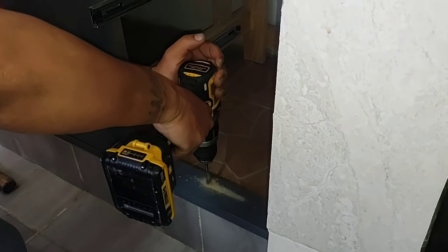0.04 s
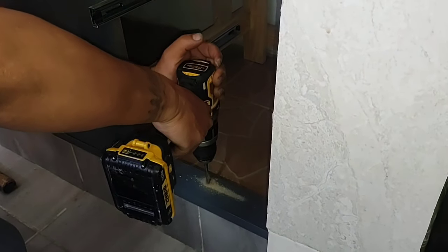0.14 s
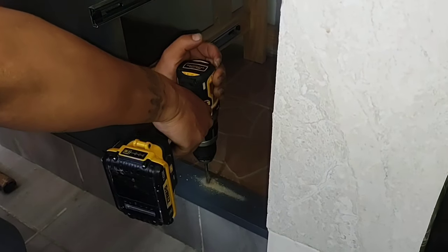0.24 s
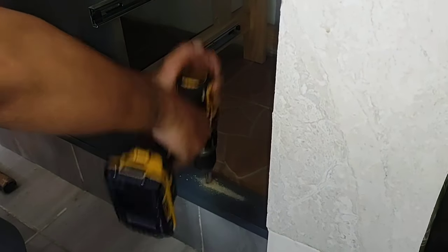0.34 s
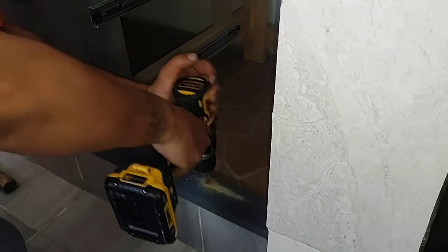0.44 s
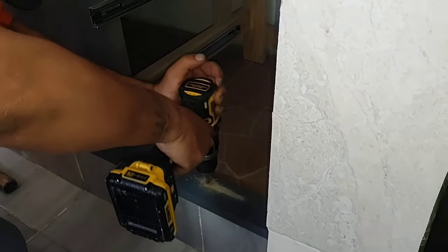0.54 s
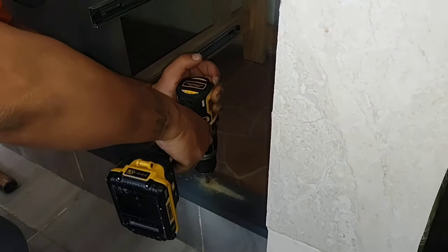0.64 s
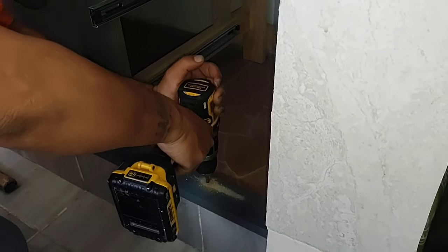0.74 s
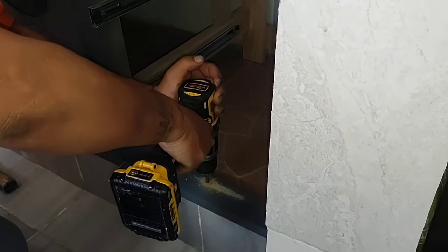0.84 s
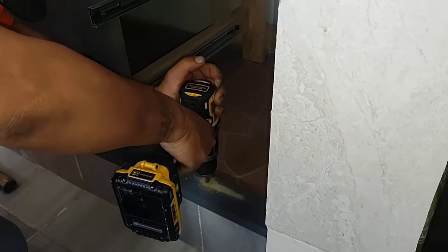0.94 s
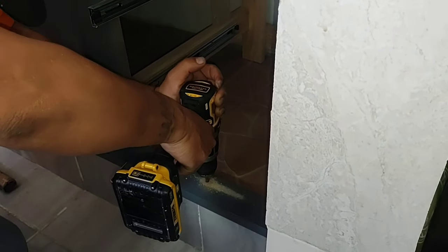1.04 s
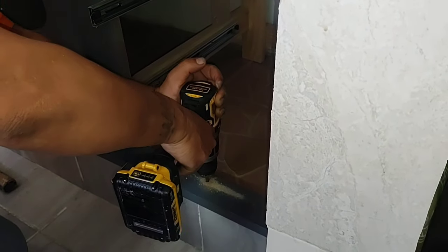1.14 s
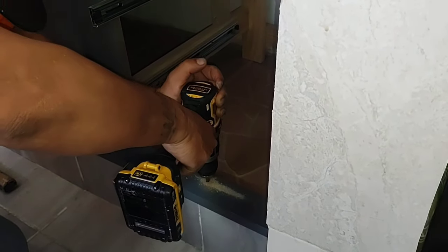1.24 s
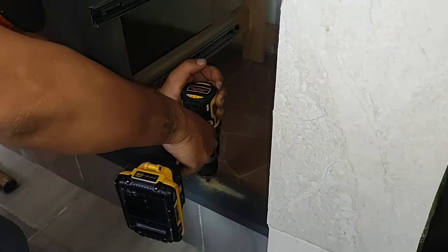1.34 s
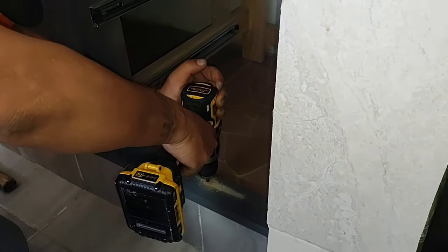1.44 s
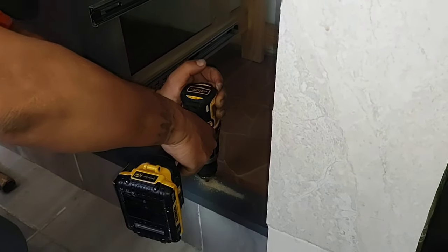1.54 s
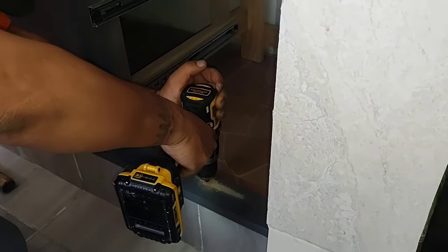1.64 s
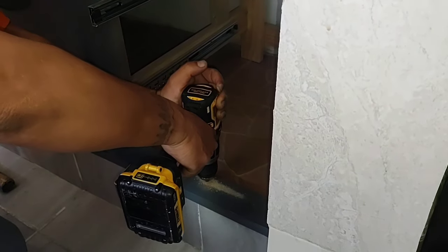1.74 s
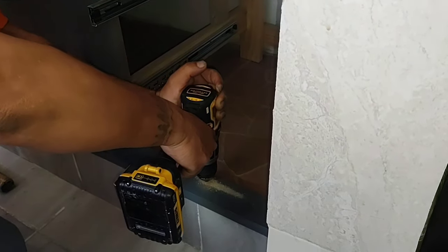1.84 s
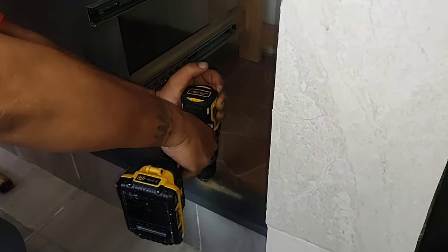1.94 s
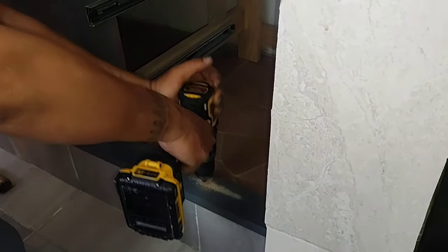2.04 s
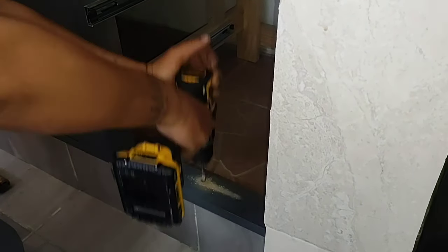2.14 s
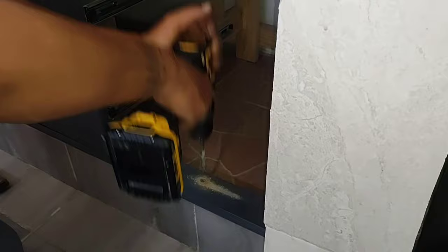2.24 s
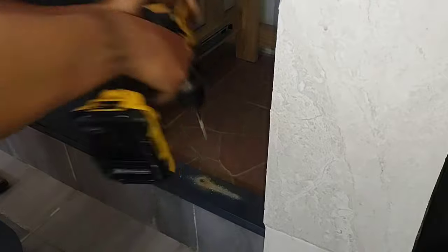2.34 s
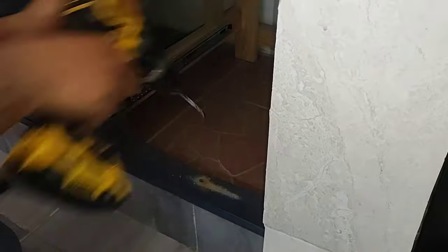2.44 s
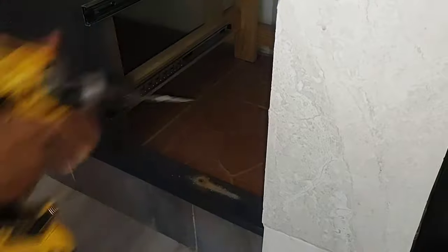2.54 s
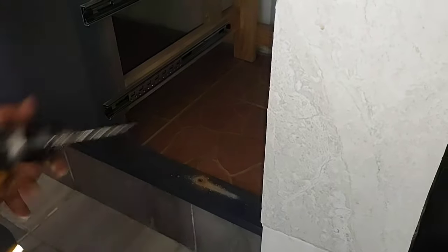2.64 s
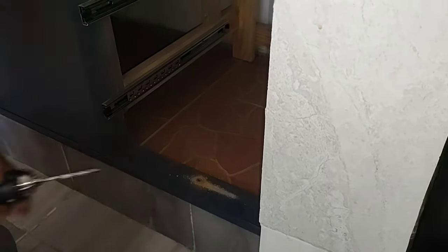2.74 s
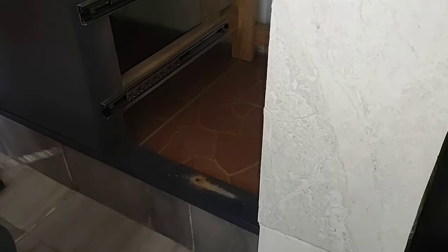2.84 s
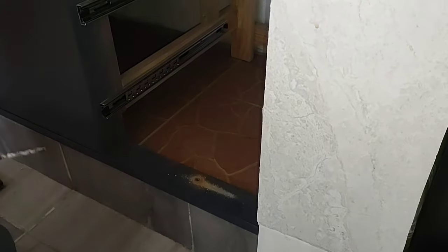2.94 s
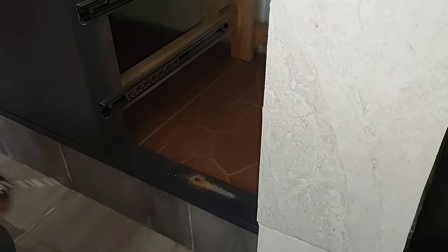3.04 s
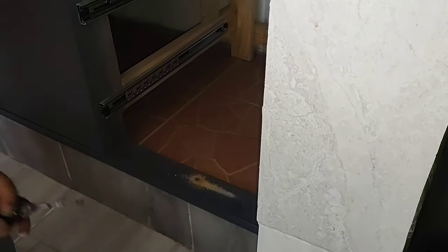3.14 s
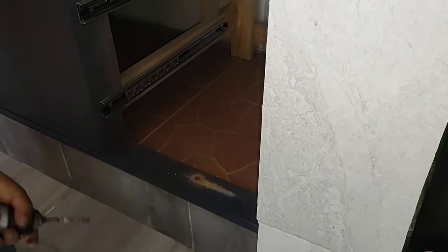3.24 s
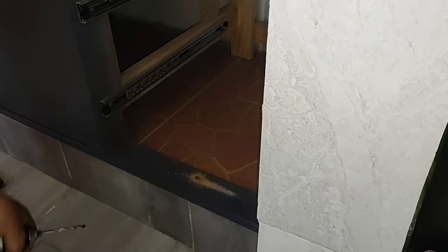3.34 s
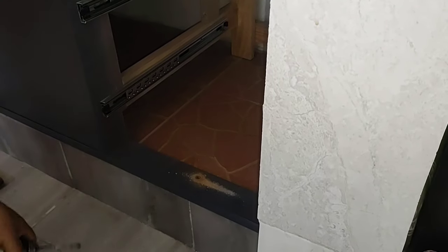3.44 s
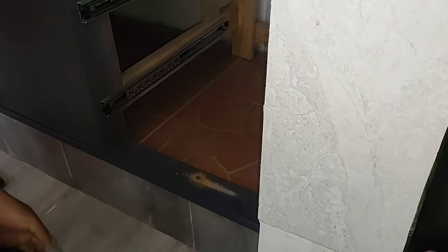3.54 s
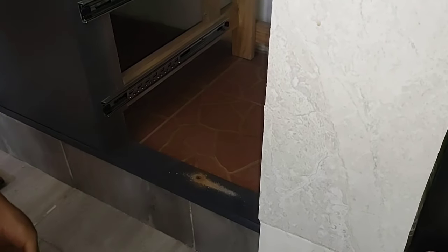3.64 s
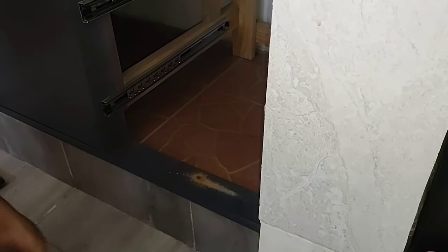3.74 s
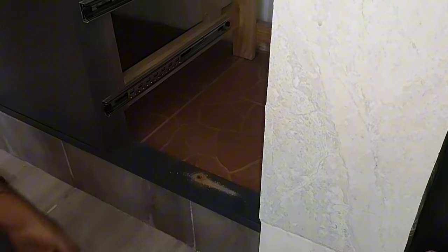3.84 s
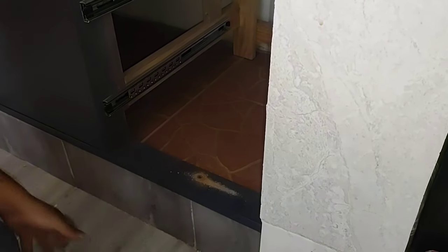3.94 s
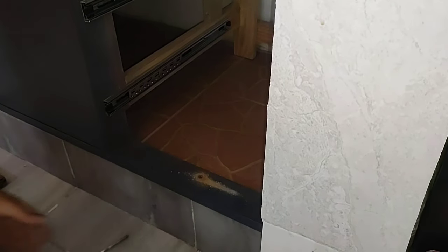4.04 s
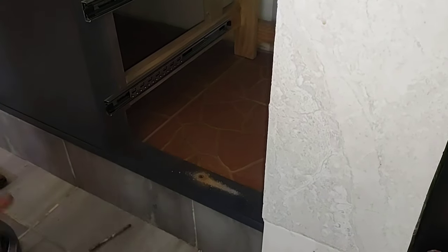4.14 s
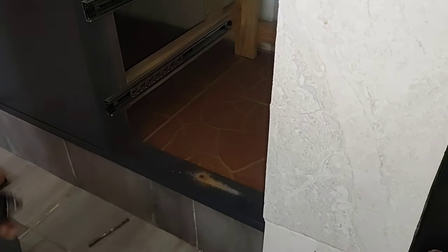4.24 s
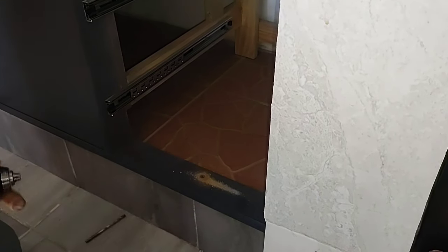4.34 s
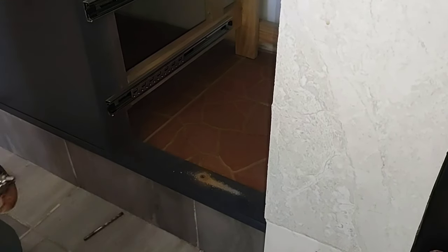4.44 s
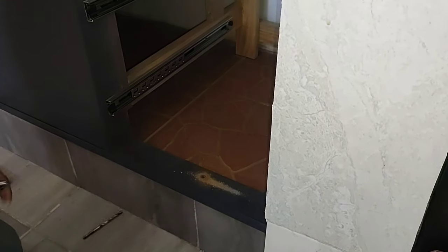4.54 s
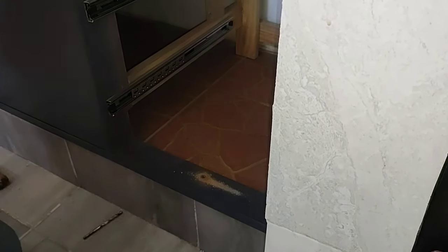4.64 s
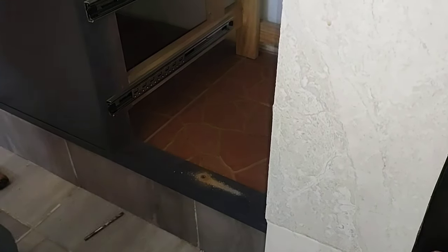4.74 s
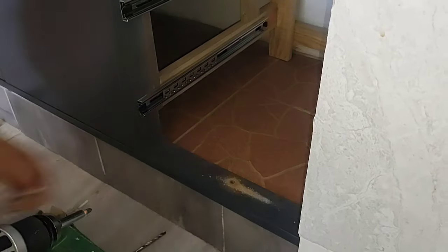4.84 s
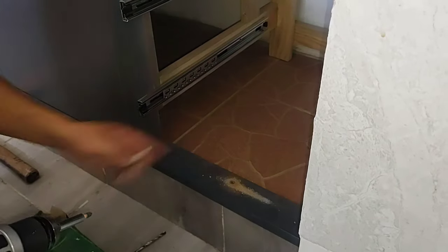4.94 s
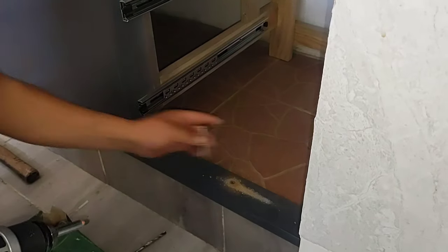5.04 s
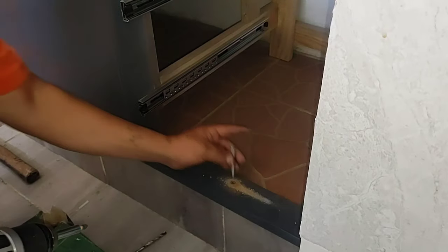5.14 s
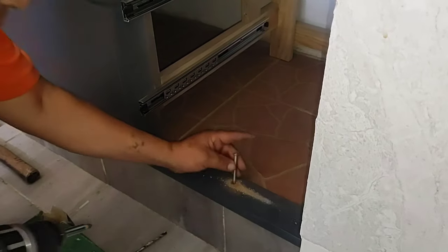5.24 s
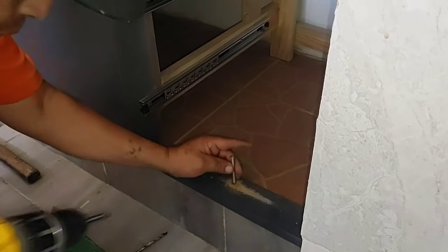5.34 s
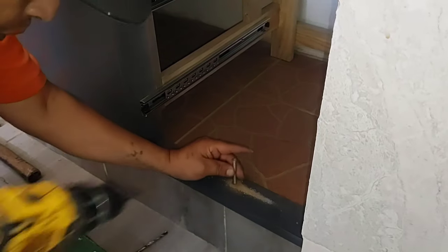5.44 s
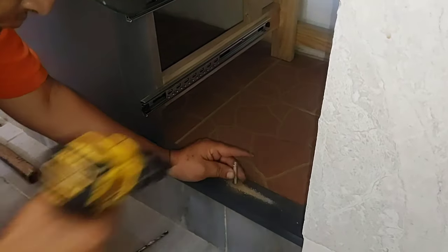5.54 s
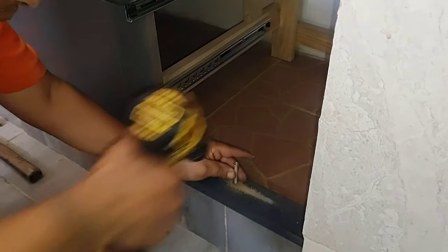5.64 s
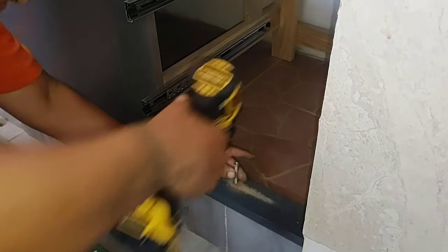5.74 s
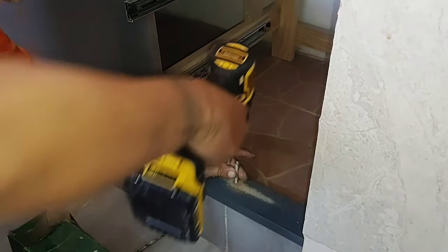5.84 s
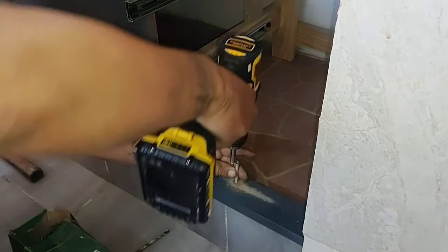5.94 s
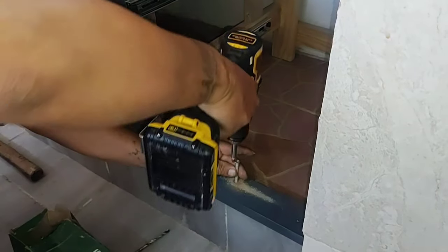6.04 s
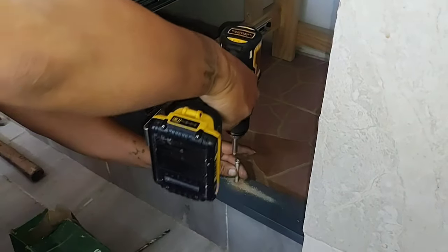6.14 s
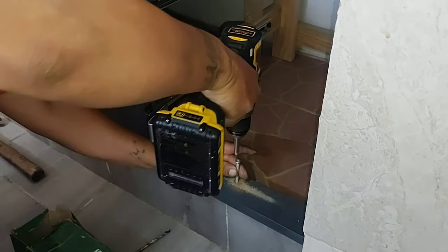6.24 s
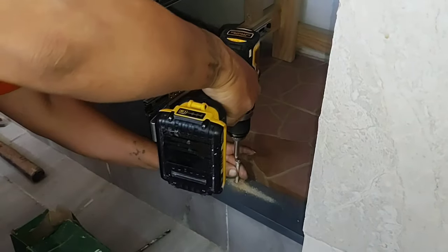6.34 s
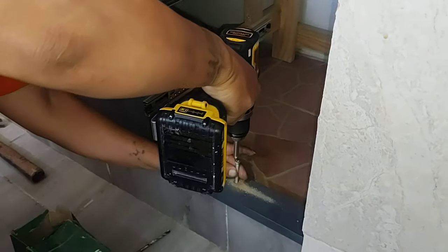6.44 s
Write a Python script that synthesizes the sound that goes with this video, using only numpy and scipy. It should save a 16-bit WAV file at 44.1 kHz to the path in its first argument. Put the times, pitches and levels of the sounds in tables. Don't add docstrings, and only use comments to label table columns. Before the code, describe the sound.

Close in a quiet tiled room, a cordless drill revs up with a whining gear tone, bites into a wooden sill and bores steadily, then slows, scrapes out and stops with sharp clacks. Much quieter chuck clicks and thin squeaks follow. A metal bit drops on tile, bounces and rolls with a high ring, then soft taps of a hollow case and screw.

```python
import sys
import numpy as np
from scipy import signal
from scipy.fft import rfft, irfft, next_fast_len
from scipy.io import wavfile
from scipy.ndimage import uniform_filter1d, map_coordinates

SR = 44100
rng = np.random.default_rng(int(sys.argv[2]) if len(sys.argv) > 2 else 0)


def store_pcm(level_fs):
    pcm = np.round(np.clip(level_fs, -1, 1) * 32767).astype(np.int16)
    wavfile.write(sys.argv[1], SR, np.atleast_2d(pcm).T)


def attenuation_scalar(level_db):
    decades = np.asarray(level_db, float) / 20
    return 10 ** decades


N = 286340

BITE_S, SLIP_S, SEAT_S, TRUE_S, DEEP_S = .395, .615, .455, .8, 1.6
THROUGH_S, BACK_S, SNAG_S, STOP_S = 1.95, 2.11, 2.225, 2.45
SEATED_HZ, FULL_HZ, SAGGED_HZ, BACK_HZ = 571, 568.1, 562, 344
TEETH = 17.3
# (time [s], tooth rate [Hz])
RUN_UP = [(0, 346), (.05, 390.8), (.2, 456.8), (.255, 467.8), (.272, 546), (.36, 564.6), (.39, 567.4),
          (.4, 531.3), (.447, 538.4)]
# (multiple of tooth rate, level under the fourth [dB])
UPPER_LINES = [(1.449, -17), (3.449, -14.5), (5, -6), (5.79, -12), (6.03, -12), (6, -15), (7, -10),
               (8, -18), (9, -26.5), (10, -28.5), (12, -23.5), (13.15, -25)]
# ([dB], ..)
FREE_DB = [-29, -29, -25, -28.5]
SHALLOW_DB = [-20.5, -26.5, -19.5, -22.5]
DEEP_DB = [-18, -30.5, -18.5, -28.5]
THROUGH_DB = [-14, -15.5, -17.5, -25.5]
BACK_DB = [-54, -42.5, -42, -41]
# (change [dB], ..)
SHIFT_DB = [-3, -6.5, -8.5, -6]
# (time [s], ..)
LET_GO_S = [2.085, 2.072, 2.008, 2.025]
# (multiple, chuck turns away, level under the line [dB])
SIDEBANDS = [(1, 1, -16), (1, -1, -19), (1, -5, -25), (3, -3, -17), (7, 1, -5), (1, 2, -14), (1, -2, -24),
             (2, -2, -11), (2, 4, -11), (3, -2, -14), (3, 2, -13), (3, 4, -15), (4, -2, -8), (4, -1, -16),
             (4, 2, -13), (5, 2, -8), (5, -2, -13), (7, 2, -4), (7, -2, -5), (6, -2, 0)]
# (multiple, depth [dB])
THROB_DB = [(1, -1), (2, 2), (4, 4.2), (5, -2)]
# (time [s], level [dB], cutting load [0-1])
WHIRR = [(0, -19, 0.2), (.16, -13, .08), (.22, -16, .1), (.37, -12.5, .17), (.4, -20.5, .55),
         (.46, -22.5, .67), (.48, -17, .68), (.53, -19, 1), (1.1, -21, 0.9), (1.9, -18.5, .92),
         (1.93, -21.5, .95), (2.01, -20, 0.99), (2.04, -23, 0.99), (2.11, -26.5, 0.2), (2.16, -28.5, .15),
         (2.42, -30, 0.2), (2.46, -28, 0.5), (2.5, -36.5, .42)]
# (frequency [Hz], density [dB])
FREE_COLOUR = [(150, -55.5), (250, -28), (392, -7), (480, -5.5), (555, -4.5), (680, -5), (909, -5),
               (1530, 1.5), (1800, -0.5), (2550, -7.5), (3260, -2.5), (6540, -9.5), (8010, -18),
               (10400, -55.5), (17600, -120)]
CUTTING_COLOUR = [(150, -71.5), (250, -48), (502, -19.5), (563, -7), (680, -18.5), (1130, -11), (1510, -15),
                  (1670, -9.5), (1930, -15), (2330, -18), (2550, -22.5), (2820, -18), (4050, -15.5),
                  (7030, -24.5), (8010, -26), (10400, -66.5), (17600, -120)]
BACKING_COLOUR = [(150, -42), (250, -16.5), (334, -4.5), (480, -10.5), (555, -6), (896, -10.5), (992, -5.5),
                  (1180, -4.5), (2900, -2.5), (6730, -18), (8010, -26.5), (10400, -60.5), (17600, -120)]
# (frequency [Hz], width [Hz], level [dB])
HOUSING = [(2420, 50, 4.5), (2810, 45, 10), (3080, 46, 6), (3290, 34, 8), (3920, 110, 3.5), (4350, 32, 2.5),
           (4700, 98, 6), (6400, 220, 1.5)]
CASING = [(752, 65, 4), (1990, 12, 4), (2080, 270, 7.5), (3365, 150, 9), (4180, 900, 2.5), (4545, 56, 6.5),
          (5630, 27, 2.5), (6560, 19, 3.5), (6850, 60, 5.5)]
BORE = [(412.6, 25, 1.5), (560, 48, 3.5), (1020, 33, 7.5), (1431, 45, 5.5), (2102, 50, 4.5),
        (2340, 65, 3.5), (2820, 38, 7), (4430, 35, 5.5), (5890, 22, 6), (6560, 60, 4.5)]
# (time [s], length [s], level [dB])
SQUEAL = [
    (2.05, 0.078, -23),
]
# (time [s], length [s], frequency [Hz], level [dB])
RUBS = [(2.1, .035, 4720, -33.5), (2.1, .03, 5680, -39.5), (2.105, .03, 2260, -29), (2.11, .06, 812, -31.5),
        (2.156, .02, 400, -30), (2.21, .035, 335.4, -30), (2.205, .045, 1020, -30.5),
        (2.21, .02, 1760, -31), (2.045, .05, 261, -36.5), (2.367, .02, 1382, -30.5),
        (2.411, .008, 1382, -29.5)]
# (time [s], length [s], frequency [Hz], level [dB])
CHATTER = [(.015, .06, 2420, -26.5), (.07, .045, 3050, -25.5), (0.067, 0.031, 2850, -23),
           (0.12, .012, 2840, -23.5), (.24, .02, 2880, -23.5), (0.22, .05, 4680, -29),
           (.2, 0.092, 3370, -27.5), (.272, 0.014, 550, -23.5), (0.37, 0.037, 560, -26.5),
           (.143, .012, 1100, -22.5), (.16, 0.032, 2860, -23.5), (.41, 0.026, 1625, -22.5),
           (.415, .04, 2690, -27), (0.015, .04, 1150, -23.5), (.14, 0.036, 3920, -26)]

# (time [s], level [dB])
JUDDER = [(0, -35.5), (.2, -36.5), (.3, -47.5), (.45, -39), (.6, -42), (.8, -44), (1.55, -49.5),
          (1.95, -58), (2.06, -39.5), (2.27, -37), (2.42, -60)]
# (time [s], length [s], level [dB])
GRIPS = [
    (0, .45, -56.5),
    (.47, 0.15, -39),
    (1.03, 0.35, -49.5),
    (1.35, 0.45, -47),
    (2.1, .2, -52.5),
    (2.16, 0.027, -44.5),
    (2.3, 0.23, -58.5),
]
# (frequency [Hz], density [dB])
LOOSE_COLOUR = [(25, -89.0), (45, -37), (60, -1.5), (85, 1.5), (110, -8.5), (135, -30), (200, -120)]
OCTAVE_COLOUR = [(95, -41.0), (120, -7), (138, 0), (165, -6.5), (200, -37.5), (400, -120)]
DRONE_COLOUR = [(150, -36), (200, -8.5), (260, -11.5), (340, -6), (420, -4), (520, -32.0), (900, -120)]

# (time [s], peak [dB], low ring [Hz], treble [dB])
LOCK = [
    (2.426, -10.5, 962, -3.5),
    (2.437, -17, 949, -6),
    (2.4505, -17, 526, -3),
    (2.4535, -8, 530, -3),
    (2.462, -14, 546, -5),
    (2.475, -11.5, 546, -12),
    (2.487, -16.5, 560, -9.5),
]
BUMPS = [(2.596, -42, 532, -23), (2.703, -48, 500, -5), (2.885, -43, 516, -17), (2.918, -49.5, 513, -25.5),
         (3.066, -39, 1361, -4), (3.086, -42.5, 1080, -12.5), (3.318, -48, 1033, -17.5),
         (3.509, -48, 1390, -23), (3.687, -52.5, 510, -6), (3.768, -52, 514, -4.5), (5.506, -34, 747, -37),
         (5.522, -35, 403, -37), (5.54, -37.5, 390.4, -33)]
CLICKS = [
    (2.886, -55, 900, 0),
    (3.074, -48.5, 889, 2),
    (3.087, -46.5, 896, 2),
    (3.112, -42.5, 940, 2),
]
KNOCKS = [(3.101, -30.5, 1140, -15.5), (3.117, -28.5, 1080, -14.5), (3.5775, -50.5, 1400, -0.5),
          (3.9045, -30.5, 893, -13), (3.9715, -28.5, 856, -13), (4.022, -37, 850, -29),
          (4.05, -31.5, 1280, -15), (4.092, -37.5, 1000, -22), (4.109, -35.5, 1130, -11.5),
          (4.147, -35, 1180, -18), (4.25, -38, 1295, -14), (4.328, -39, 1313, -16), (4.182, -37, 1110, -21),
          (4.218, -41, 1119, -19), (5.496, -36.5, 600, -23), (5.934, -44.5, 523, -22)]
SCREW = [
    (6.393, -34, 666, -28.5),
]
# (frequency [Hz], density [dB])
LATCH_COLOUR = [(250, -25), (500, -3), (1300, -2), (2000, -6.5), (3000, -15), (4000, -57.5)]
THUD_COLOUR = [(200, -22), (450, -2.5), (900, 3), (1800, -1), (2800, -10.5), (4000, -28), (8000, -63)]
SCREW_COLOUR = [(300, -14), (650, 1.5), (1300, -1.5), (2500, -6.5), (3600, -10), (4700, -24), (8000, -41)]
TICK_COLOUR = [(800, -70), (2000, -21.5), (3200, -2.5), (4500, 1.5), (6500, -7), (8000, -8.5)]
# (time [s], [(frequency [Hz], level [dB], time to fall 60 dB [s]), ..])
PAWL = [
    (2.427, [(3390, -18, .035), (5200, -19, 0.016), (4180, -18, .016), (6300, -20.5, 0.011), (7240, -21.5, .012)]),
    (2.4465, [(4150, -14.5, .02)]),
    (2.437, [(3850, -15.5, .05)]),
    (2.4533, [(3870, -5.5, 0.014), (4610, -8, 0.013), (3350, -13, .014), (5690, -21.5, .012), (560, -11.5, .05), (1386, -15, .05)]),
    (2.471, [(3710, -17, 0.04)]),
    (2.4755, [(3810, -17, 0.022)]),
    (3.5775, [(5300, -49, .02), (6700, -55, .015), (1450, -55, .03)]),
]
CASE = [
    (5.513, [(397, -39, 0.2)]),
    (5.507, [(2470, -49, .06), (1000, -52, .08)]),
    (5.497, [(776, -52, .19), (836, -55, .21), (1012, -51, .25), (1730, -58, .3), (2164, -59.5, .17), (2498, -53, .15), (2570, -55, .16), (3530, -62, .09)]),
]

# (time [s], length [s], level [dB])
SCUFFS = [
    [(2.5, 0.012, -32), (2.56, .5, -66), (2.704, 0.016, -51)],
    [(3.32, 0.081, -64), (3.6, 0.42, -73.5), (3.52, 0.017, -67.5), (3.15, .75, -77.5)],
    [(5.801, 0.12, -59.5)],
    [(4.45, 0.21, -69), (4.66, 0.071, -61), (5.13, 0.1, -65), (5.43, 0.048, -61.5)],
]
# (time [s], ..)
SCUFF_RISE_S = [.012, 0.021, 0.017, 0.089]
SCUFF_FALL_S = [.035, .035, .035, 0.076]
# (frequency [Hz], density [dB])
SWING_COLOUR = [(300, -1.0), (600, 5), (1800, -4.0), (2700, -4.5), (5000, -15.5), (8000, -28.5)]
CHUCK_COLOUR = [(290, -34), (500, -21.5), (684, -6.5), (1370, -7), (2040, -14.5), (2630, -10), (3850, -18),
                (5270, -21), (8000, -29), (10400, -60), (17600, -120)]
CLOTH_COLOUR = [(300, -40), (600, -0.5), (970, 0), (1300, -3), (1730, 4.5), (2100, -4.5), (3000, -5),
                (3850, -5), (4120, 0.5), (4500, -6), (5000, -14), (7400, -21.5), (9000, -90.5)]
SLEEVE_COLOUR = [(400, -40), (700, -10), (1150, -9), (1700, 1), (2300, -21), (3000, -17), (7500, -32),
                 (9000, -89.5)]
# (start [s], end [s], from [Hz], to [Hz], level
# [dB])
SQUEAKS = [(2.56, 2.71, 2690, 2670, -60.5), (2.7, 2.82, 2680, 2680, -71), (2.66, 2.81, 1740, 1720, -66),
           (2.96, 3.05, 1950, 1940, -72), (3.49, 3.56, 1340, 1330, -65), (3.34, 3.42, 1380, 1320, -66),
           (5.43, 5.465, 1760, 1750, -56), (2.575, 2.615, 3560, 3550, -62), (2.57, 2.67, 1770, 1770, -58),
           (3.335, 3.375, 3620, 3540, -69), (3.37, 3.5, 3620, 3580, -76), (3.355, 3.42, 3120, 3330, -70),
           (3.39, 3.47, 3130, 3150, -74), (3.385, 3.46, 2240, 2620, -70), (3.435, 3.56, 2620, 2640, -68),
           (3.54, 3.68, 2640, 2590, -73), (3.625, 3.74, 3290, 3220, -73), (3.64, 3.72, 3120, 3020, -70),
           (3.66, 3.75, 2900, 2850, -73), (3.67, 3.77, 2720, 2650, -75), (3.71, 3.83, 3130, 3060, -75),
           (3.77, 3.87, 2170, 2160, -69), (3.3, 3.41, 1780, 1700, -69), (3.91, 4.26, 2160, 2150, -58)]

# (time [s], level [dB])
ROLL = [(3.91, -70), (3.962, -68), (3.974, -45.5), (4.045, -52.5), (4.056, -49.5), (4.11, -46.5),
        (4.198, -49.5), (4.278, -45.5), (4.37, -51.5), (4.4, -65), (4.47, -74)]
# (time [s], level [dB])
RING = [(3.915, -77), (3.955, -72), (3.972, -57), (4.035, -45), (4.048, -46), (4.056, -36.5), (4.125, -33),
        (4.16, -42.5), (4.29, -41.5), (4.4, -64), (4.44, -76)]
# (frequency [Hz], level [dB])
BIT_MODES = [(6076, -4), (6128, 1), (6190, -5), (6239, -6)]
# (frequency [Hz], density [dB])
TILE_COLOUR = [(290, -23), (500, -20), (772, -11), (837, -3), (1050, -7.5), (1120, -2.5), (1520, -5.5),
               (2190, -7.5), (2900, -13.5), (3800, -26), (5600, -21.5), (7280, -24), (12300, -120)]
JINGLE_COLOUR = [(3500, -40), (4600, -2.5), (5500, -0.5), (7400, -3), (8400, -37)]

QUIET_DB, RUMBLE_DB = -61.5, -70
# (frequency [Hz], density [dB])
AIR_COLOUR = [(440, -34), (740, -3.5), (1070, -7), (1900, -13), (2400, -20.5), (5120, -23.5), (8010, -28),
              (10400, -54), (17600, -120)]
RUMBLE_COLOUR = [(20, -19.5), (45, -13), (62, 0), (120, 0.0), (250, -6.0), (400, -15), (900, -120)]
# (frequency [Hz], width [Hz], level [dB])
HUM = [(122.4, 6.6, -0.5), (188.3, 5.5, 5), (243.1, 8.3, 1.5), (289.1, 22, -2.5), (435, 61, -5),
       (503, 11, 7), (546, 19, 1)]
# (time [s], length [s], level [dB])
STEPS = [
    (2.4, .2, -61.5),
    (2.7, 0.61, -68.5),
    (4.1, .2, -63.5),
]
# (frequency [Hz], time to fall 60 dB [s])
ECHO = [(200, 0.68), (1000, 0.61), (3000, .35), (8000, .2)]


def unit(x):
    return x / np.sqrt(np.mean(x ** 2) + 1e-20)


def along(points, hz):
    f, v = np.transpose(points)
    return np.interp(np.log(hz + 1), np.log(f + 1), v)


def curves(rows):
    s, *cols = np.transpose(rows)
    t = np.arange(N) / SR
    is_open = (t >= s[0] - .01 * (s[0] == 0)) * (t <= s[-1])
    gate = uniform_filter1d(1. * is_open, size=600)
    return [np.interp(t, s, c) for c in cols] + [gate]


def swells(rows, rise_s, fall_s):
    t = np.arange(N) / SR
    power = 0
    for s, length, db in rows:
        outside = np.maximum((s - t) / rise_s, (t - s - length) / fall_s).clip(0, 9)
        power = power + attenuation_scalar(2 * (db - 20 * outside))
    return np.sqrt(power)


def wobble(rate):
    knots = rng.standard_normal(int(N * rate / SR) + 4)
    return map_coordinates(knots, [np.arange(N) * rate / SR])


def filtered(x, response):
    m = next_fast_len(len(x) + 8192)
    return irfft(rfft(x, m) * response(np.fft.rfftfreq(m, 1 / SR)), m)[:len(x)]


def modes(table):
    def response(f):
        total = 0
        for k, (c, w, db) in enumerate(table):
            total = total + (-1) ** k * attenuation_scalar(db) * 1j * f * w / (c * c - f * f + 1j * f * w + 1e-9)
        return total
    return response


def coloured(x, spectrum):
    return unit(filtered(x, lambda hz: attenuation_scalar(along(spectrum, hz))))


def resonant(x, table):
    return filtered(x, lambda f: 1 + abs(modes(table)(f)))


def patchy(depth_db):
    z = signal.stft(rng.standard_normal(N), nperseg=512)[2]
    field = uniform_filter1d(rng.standard_normal(z.shape), size=5, axis=0)
    field = uniform_filter1d(field, size=8, axis=1)
    return signal.istft(z * attenuation_scalar(depth_db * unit(field)), nperseg=512)[1][:N]


def room_tone():
    air = coloured(patchy(1.5), AIR_COLOUR)
    hum = unit(filtered(rng.standard_normal(N), lambda f: modes(HUM)(f) / (1 + (f / 700) ** 4)))
    rumble = coloured(rng.standard_normal(N), RUMBLE_COLOUR)
    rumble_gain = attenuation_scalar(RUMBLE_DB) + swells(STEPS, rise_s=.3, fall_s=0.27)
    return attenuation_scalar(QUIET_DB - 11.0 + 1.5 * wobble(4)) * air + attenuation_scalar(QUIET_DB - 4.5) * hum + rumble_gain * rumble


def room(x):
    hz, t, z = signal.stft(rng.standard_normal(SR * 3 // 4), SR, nperseg=256)
    tail = signal.istft(z * attenuation_scalar(-60 * t / along(ECHO, hz)[:, None]), SR, nperseg=256)[1]
    return signal.fftconvolve(np.pad(x, (400, 0)), tail / np.linalg.norm(tail))[:N]


def mesh_levels(t):
    def ramp(s, length):
        return np.clip((t - s) / length, 0, 1)

    states = (FREE_DB, SHALLOW_DB, DEEP_DB, THROUGH_DB, BACK_DB)
    free, shallow, deep, through, back = (np.array(d)[:, None] for d in states)
    bite_delay_s = np.array([[.035], [.02], [0], [.045]])
    db = free + (shallow - free) * ramp(BITE_S + bite_delay_s, 0.046)
    db = db + (deep - shallow) * ramp(DEEP_S - .5, 1.0)
    db = db + (through - db) * ramp(THROUGH_S - 0.077, 0.077)
    db = db - 60 * np.clip(t - THROUGH_S, 0, 1) * (t < BACK_S)
    db = db + (back - db) * ramp(np.array(LET_GO_S)[:, None], .022)
    loose_db = 2 * np.maximum(1 - 0.7 * ramp(BITE_S, .2), t > BACK_S)
    db = db + loose_db * np.array([wobble(22) for _ in db])
    db = db + 10 * np.exp(-((t - SNAG_S) / 0.037) ** 2)
    db = db + np.array(SHIFT_DB)[:, None] * ramp(0.28 - .01, .01) * (t < BITE_S)
    db[1] += -9.5 * np.exp(-((t - 1.4) / 0.12) ** 2)
    db[0] += -14 * np.exp(-((t - SLIP_S) / .022) ** 2)
    return db


def gear_whine(t, mesh_hz, mesh, load):
    levels, backing = mesh_levels(t), t > BACK_S
    depth = np.clip((t - TRUE_S) / (DEEP_S - TRUE_S), 0, 1)
    lines = dict(enumerate(levels, 1))
    for k, db in UPPER_LINES:
        dulling_db = -7.5 * depth * (k >= 8)
        lines[k] = levels[3] + db + .5 * (1 - load) * ~backing + dulling_db
    throb_s = t - 1.215
    throb = np.cos(2 * np.pi * 10.05 * throb_s) * (t > SLIP_S) * (t < THROUGH_S)
    throb = throb * (1 - .35 * np.clip(throb_s / .3, 0, 1)) * attenuation_scalar(1 * wobble(8.8))
    for k, db in THROB_DB:
        lines[k] = lines[k] + db * throb
    lines[2] = lines[2] + 8 * np.exp(-((2 * mesh_hz - 944) / 45) ** 2) * (t < BITE_S)
    lines[5] = lines[5] + 5.5 * np.clip((t - THROUGH_S) / .05 + 1, 0, 1) * ~backing
    out, chuck = 0, mesh / TEETH
    for k, turns, db in [(k, 0, 0) for k in lines] + SIDEBANDS:
        phase = k * mesh + turns * chuck + rng.uniform(0, 2 * np.pi)
        unsteady_db = (3 if turns else .5) * wobble(14)
        if turns:
            unsteady_db = unsteady_db - 14 * (t > THROUGH_S - .03) - 2.5
            unsteady_db = unsteady_db - 6 * (1 - depth) * (turns % 2 == 0)
            phase = phase + 0.39 * wobble(25)
        out = out + attenuation_scalar(lines[k] + db + 3.5 + unsteady_db) * np.sin(phase)
    return out


def motor_noise(teeth, whirr_db, load):
    cutting = coloured(resonant(teeth, CASING), CUTTING_COLOUR)
    rasp = coloured(resonant(teeth, HOUSING), FREE_COLOUR)
    backing = attenuation_scalar(0.0 + 1.3 * wobble(25)) * coloured(resonant(teeth, BORE), BACKING_COLOUR)
    free = np.where(np.arange(N) < SR, attenuation_scalar(-2.2) * rasp, backing)
    return attenuation_scalar(whirr_db) * (np.sqrt(1 - load) * free + np.sqrt(load) * attenuation_scalar(2.0) * cutting)


def rubbing(teeth):
    out = 0
    for s, length, hz, db in RUBS + CHATTER:
        gain = swells([(s, length, db)], rise_s=.02, fall_s=0.027)
        out = out + gain * unit(filtered(teeth, modes([(hz, 70, 0)])))
    return out


def drill():
    t = np.arange(N) / SR
    speed = RUN_UP + [(SEAT_S, SEATED_HZ), (TRUE_S, FULL_HZ), (THROUGH_S - .05, FULL_HZ),
                      (BACK_S, SAGGED_HZ), (BACK_S + .03, BACK_HZ), (STOP_S, BACK_HZ)]
    mesh_hz, gate = curves(speed)
    whirr_db, load, on = curves(WHIRR)
    load = np.clip(load, 0, 1)
    slack = .0004 * wobble(30) + .0007 * wobble(11)
    slack = slack + .05 * (t > BACK_S) * wobble(90) + .0015 * (load < .5) * wobble(60)
    mesh = 2 * np.pi * np.cumsum(mesh_hz * (1 + slack)) / SR
    pulse = 1 + .2 * np.cos(mesh) + .13 * np.cos(2 * mesh) + .07 * np.cos(mesh - mesh / TEETH)
    teeth = patchy(1.1) * pulse
    squeal = swells(SQUEAL, rise_s=.02, fall_s=.025) * np.sin(2 * np.pi * 3285 * t)
    whine = gate * gear_whine(t, mesh_hz, mesh, load)
    return whine + on * motor_noise(teeth, whirr_db, load) + squeal + rubbing(teeth)


def sill():
    t = np.arange(N) / SR
    drone_db, on = curves(JUDDER)
    grip = swells(GRIPS, rise_s=0.076, fall_s=0.18)
    beat = np.sin(2 * np.pi * 65 * t + .3 * wobble(12) + 2 * np.pi * 6 * np.minimum(t, TRUE_S))
    loose = coloured(rng.standard_normal(N), LOOSE_COLOUR)
    octave = coloured(rng.standard_normal(N), OCTAVE_COLOUR)
    drone = coloured(patchy(3.3), DRONE_COLOUR)
    loose_gain = np.maximum((grip * attenuation_scalar(39)).clip(.6, 1.1) ** 3, np.arange(N) > THROUGH_S * SR)
    octave_gain = attenuation_scalar(drone_db - 8) * on + attenuation_scalar(-4) * grip * (grip * attenuation_scalar(38.5)).clip(0, 1) ** 2
    return grip * (1.4 * beat + 1.0 * loose * loose_gain) + on * attenuation_scalar(drone_db) * drone + octave_gain * octave


def knocks(events, body, attack, edge, high_hz, t60):
    out, t = np.zeros(N + SR), np.arange(SR // 2) / SR
    decay = attenuation_scalar(-60 * t / max(t60, .02)) * (1 - np.exp(-t / attack))
    for s, db, low_hz, treble_db in events:
        dull, bright = rng.standard_normal((2, len(t)))
        bright = filtered(bright, lambda f: 1 + 5 * abs(modes([(high_hz, 600, 0)])(f)))
        bright = coloured(bright, TICK_COLOUR) * attenuation_scalar(-60 * t / .5)
        burst = coloured(dull, body) + attenuation_scalar(treble_db + 4.5) * bright
        burst = burst * (1 + edge * attenuation_scalar(-60 * t / 0.024))
        ring = 2.24 * np.sin(2 * np.pi * low_hz * t) * attenuation_scalar(-60 * t / 0.12)
        out[round(s * SR):][:len(t)] += attenuation_scalar(db - 15.0) * decay * (burst + ring)
    return out[:N]


def pings(events):
    out, t = np.zeros(N + SR), np.arange(SR // 2) / SR
    for s, rows in events:
        ring = 0
        for hz, db, t60 in rows:
            tone = np.sin(2 * np.pi * hz * t + 0.31 * wobble(150)[:len(t)])
            ring = ring + attenuation_scalar(db - 60 * t / max(t60, .01)) * tone
        out[round(s * SR):][:len(t)] += ring * (1 - np.exp(-t / 0.00098))
    return out[:N]


def hands():
    out, t = 0, np.arange(N) / SR
    colours = [SWING_COLOUR, CHUCK_COLOUR, CLOTH_COLOUR, SLEEVE_COLOUR]
    for rows, rise_s, fall_s, colour in zip(SCUFFS, SCUFF_RISE_S, SCUFF_FALL_S, colours):
        out = out + swells(rows, rise_s=rise_s, fall_s=fall_s) * coloured(patchy(2.5), colour)
    for start, end, from_hz, to_hz, db in SQUEAKS:
        u = np.clip((t - start) / (end - start), 0, 1)
        hz = from_hz + (to_hz - from_hz) * u + 46 * wobble(300)
        flutter_db = 2.5 * wobble(50) - .5
        gain = attenuation_scalar(db + flutter_db) * np.sqrt(np.sin(np.pi * u) + 1e-9) * (u > 0)
        out = out + gain * np.sin(2 * np.pi * np.cumsum(hz) / SR)
    return out


def rolling_bit():
    rattle_db, gate = curves(ROLL)
    ring_db, ringing = curves(RING)
    t = np.arange(N) / SR
    ticks = rng.standard_normal(N) * attenuation_scalar(2.2 * wobble(300))
    ring = 0
    for hz, db in BIT_MODES:
        tilt_db = .3 * (hz - 6150) * (t - 4.17).clip(-.2, .3)
        gain = attenuation_scalar(db + 2.8 * wobble(35) + tilt_db)
        ring = ring + gain * np.sin(2 * np.pi * hz * t + .5 * wobble(45))
    ring = unit(ring * ringing) * np.sqrt(ringing.mean())
    rattle = coloured(ticks, TILE_COLOUR[:-1] + [(7800, -27), (8400, -55.5)])
    jingle = coloured(ticks[::-1], JINGLE_COLOUR)
    bright = ringing * (attenuation_scalar(ring_db) * ring + attenuation_scalar(0.65 * ring_db - 36) * jingle)
    return bright + gate * attenuation_scalar(rattle_db + 0.5) * rattle


def scene():
    hits = knocks(LOCK, LATCH_COLOUR, 0.00053, 0.73, high_hz=3880, t60=0.095)
    hits = hits + knocks(KNOCKS, THUD_COLOUR, 0.00084, 0.78, high_hz=2600, t60=0.21)
    hits = hits + knocks(BUMPS, THUD_COLOUR, 0.002, 0.21, high_hz=2701, t60=.17)
    hits = hits + knocks(SCREW, SCREW_COLOUR, 0.0016, .2, high_hz=2500, t60=0.25)
    hits = hits + knocks(CLICKS, THUD_COLOUR, 0.0011, 0.27, high_hz=6480, t60=0.092)
    hits = hits + pings(PAWL + CASE)
    near = drill() + sill() + hits + rolling_bit() + hands()
    mono = near + attenuation_scalar(-20.0) * room(near) + room_tone()
    return np.array([mono, mono])


def roll_off(x):
    return signal.sosfilt(signal.butter(12, 8160, fs=SR, output="sos"), x)


def record(dry):
    held = dry[0] / (1 + abs(dry[0] / .97) ** 6) ** (1 / 6)

    def band_limit(hz):
        treble_cut = 1 / (1 + (hz / 7908) ** 60)
        return treble_cut / np.sqrt(1 + (42 / (hz + 1)) ** 4)

    band = filtered(held, band_limit)
    band = band + attenuation_scalar(-95.5) * rng.standard_normal(N)
    return roll_off(np.array([band, band]))


dry = scene()
out = record(dry)
store_pcm(out)
```